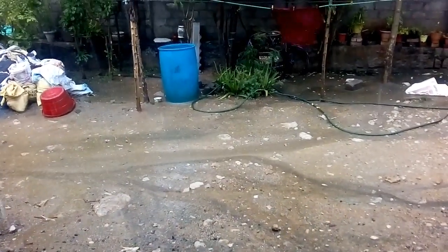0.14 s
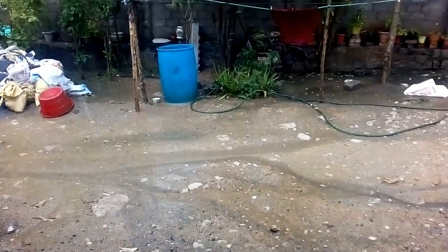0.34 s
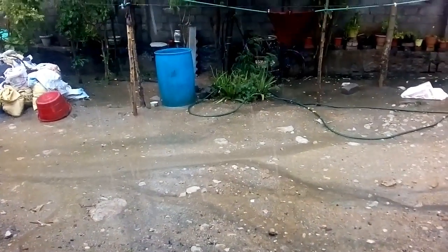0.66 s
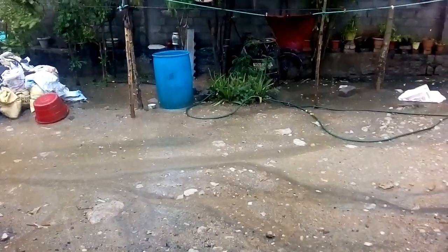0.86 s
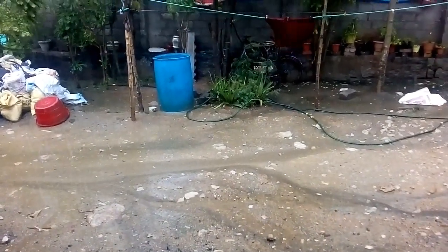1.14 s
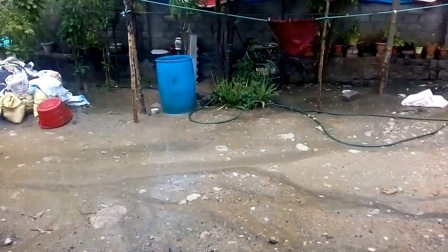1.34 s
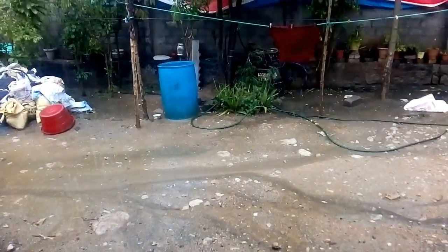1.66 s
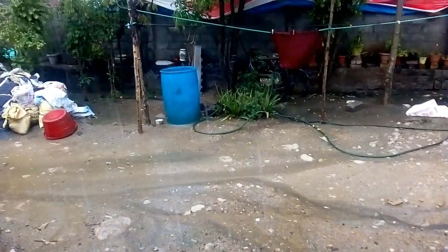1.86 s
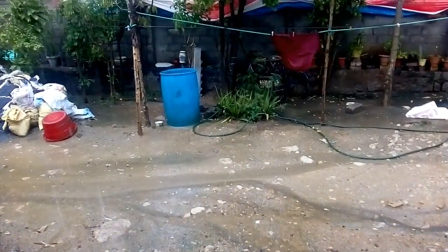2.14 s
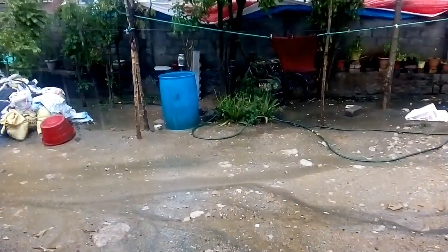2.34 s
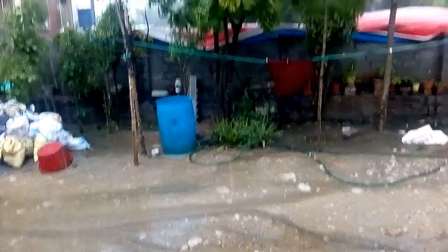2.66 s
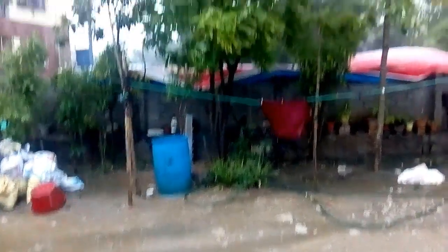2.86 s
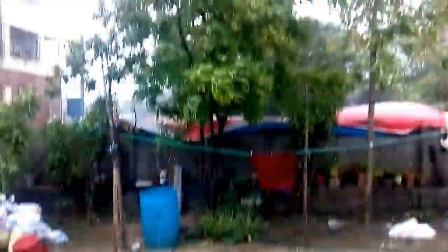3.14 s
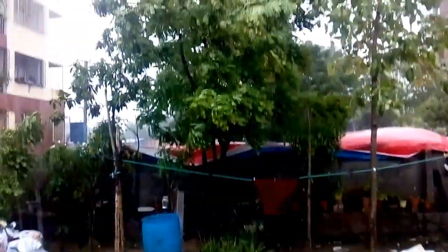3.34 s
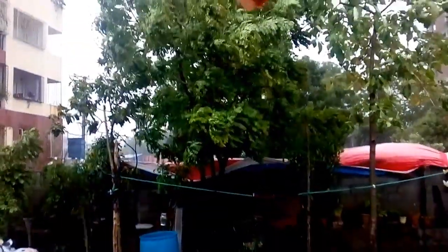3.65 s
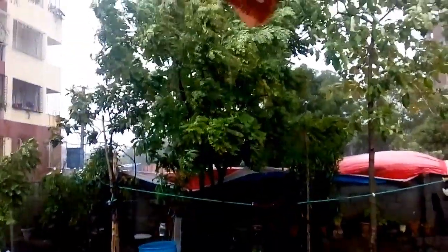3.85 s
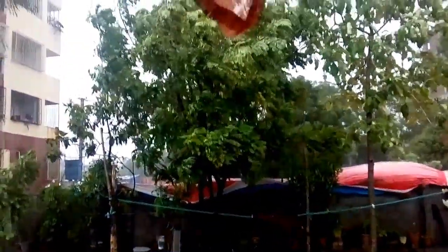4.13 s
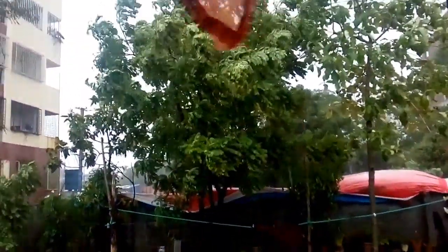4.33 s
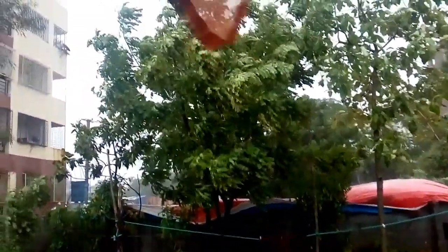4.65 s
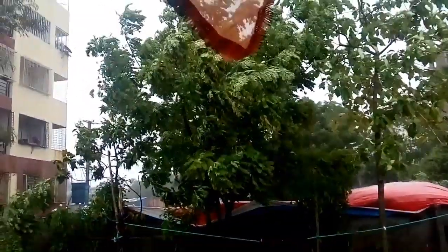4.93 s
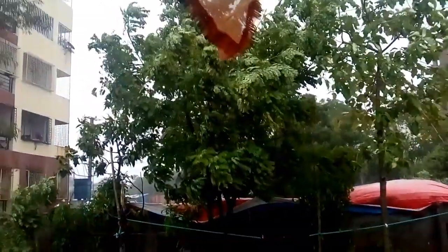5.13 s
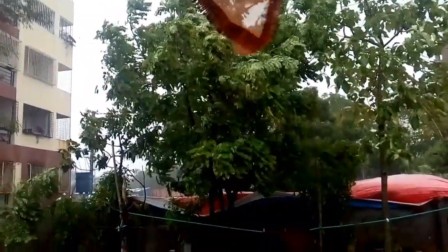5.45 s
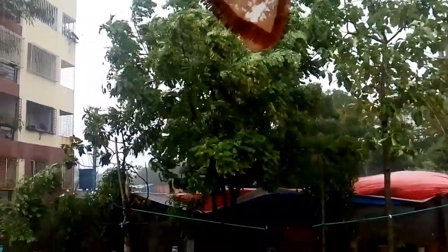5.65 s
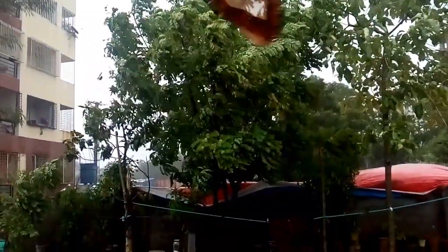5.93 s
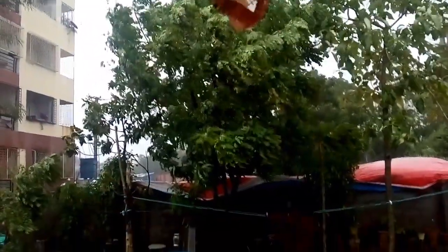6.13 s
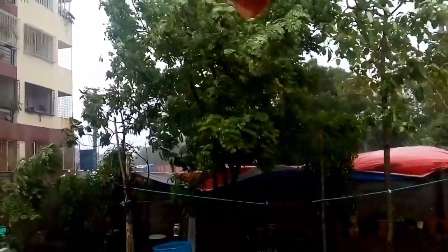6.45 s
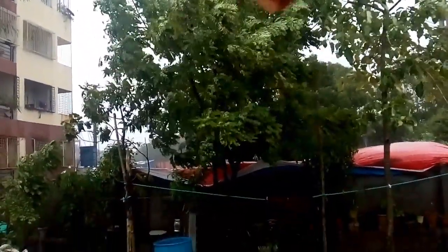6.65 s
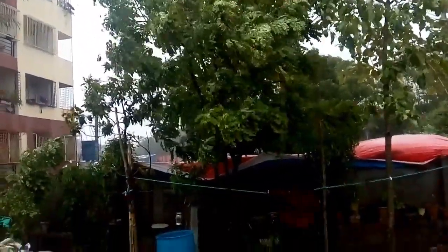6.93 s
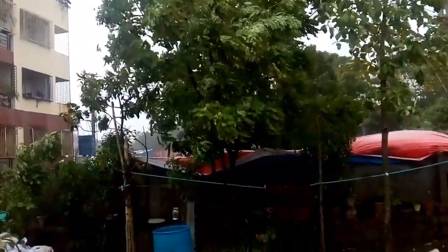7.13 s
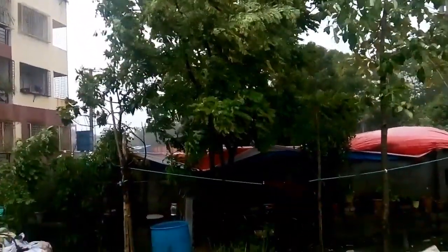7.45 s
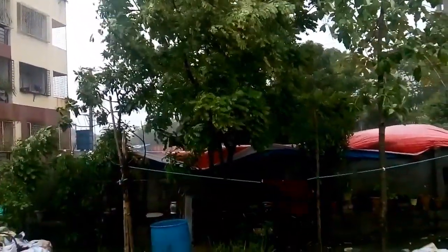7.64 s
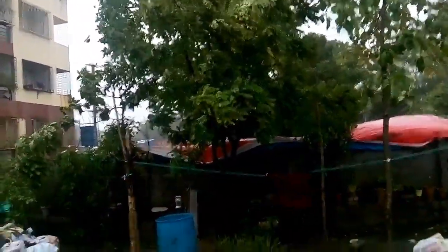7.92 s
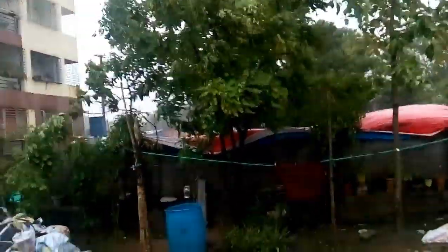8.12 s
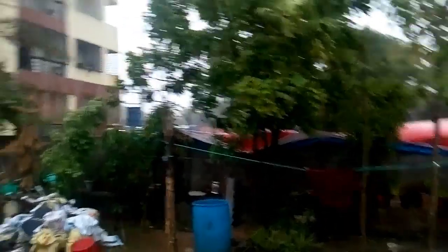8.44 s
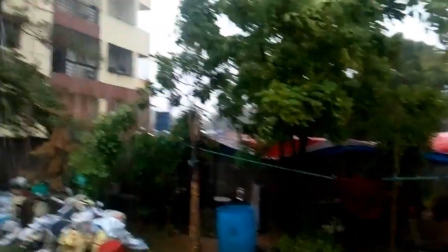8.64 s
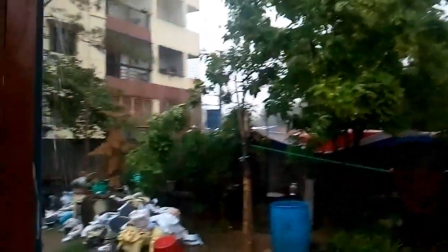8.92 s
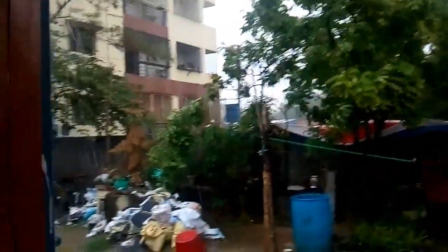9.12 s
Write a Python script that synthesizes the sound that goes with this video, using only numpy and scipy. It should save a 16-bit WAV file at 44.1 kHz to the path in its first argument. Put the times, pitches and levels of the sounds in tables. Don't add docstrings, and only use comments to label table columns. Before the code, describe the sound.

Steady rain on a wet dirt yard and leafy trees, heard from under an eave on a small, bright, slightly thin microphone. Far drops blend into constant hiss over a faint low wash; nearer drops tick densely. Close splats, puddle plinks and heavy drips strike irregularly, crowding together midway, then spreading out as rain eases slightly.

```python
import sys
import numpy as np
from scipy import signal
from scipy.fft import rfft, irfft
from scipy.io import wavfile
from scipy.ndimage import uniform_filter1d

SR = 44100
rng = np.random.default_rng(int(sys.argv[2]) if len(sys.argv) > 2 else 0)


def digitize_waveform(pressure):
    field = np.atleast_2d(pressure).T
    bounded = np.clip(field, -1, 1)
    quanta = np.round(bounded * 32767).astype(np.int16)
    wavfile.write(sys.argv[1], SR, quanta)


def ratio_of_db(decibels):
    return 10 ** (np.asarray(decibels, float) / 20)


N = 409688

# (time [s], rain level [dB], low wash level [dB])
RAIN_LEVELS = [
    (0.0, -25.5, -41),
    (0.77, -26, -43.5),
    (3.0, -26, -42),
    (3.49, -25.5, -42),
    (6.21, -26.5, -42),
    (9.29, -26.5, -41.5),
]
# (frequency [Hz], level per Hz [dB])
WASH_SPECTRUM = [(18, -13), (30, -19), (140, -1), (221, -2), (330, -1), (395, 1), (470, -2.5), (600, -4.5),
                 (1060, -2.5), (1500, -6), (2200, -27)]
# (time [s], peak level [dB], splash ring [Hz], length [ms])
NEAR_SPLATS = [(0.3762, -4.9, 6200, .6), (0.6531, -6.7, 5170, .8), (0.7683, -5.3, 6030, 1.1),
               (1.0337, -6.9, 5860, 1), (1.3575, -7.9, 6160, 1.3), (1.4519, -5.1, 5470, .8),
               (1.5113, -7.2, 5600, .8), (1.8104, -6.5, 6070, .7), (1.8866, -7.8, 5340, 1.5),
               (1.9537, -4.3, 6630, .7), (2.1972, -7.3, 5900, 1.5), (2.293, -6.9, 5640, .6),
               (2.626, -6.8, 6590, .9), (2.7007, -6.3, 6120, .9), (2.9948, -7.9, 6590, .6),
               (3.02, -8.1, 6500, 1.5), (4.1188, -7.8, 6460, .6), (4.5012, -7.6, 6500, 1.5),
               (5.1728, -6.3, 6460, .8), (6.0939, -6.6, 6800, .5), (6.3878, -8.5, 5900, 2),
               (7.4311, -7.6, 6460, .8), (7.6209, -8.5, 5770, 1.1), (7.7563, -6.2, 5340, 1.2),
               (7.8871, -6, 6800, .5), (7.9584, -7, 5900, 1.1), (8.0847, -9.3, 5600, .9),
               (8.1669, -8, 6160, 1.1), (8.5305, -7.5, 6160, .7), (9.0538, -6.2, 6030, .7)]
# (time [s], peak level [dB], puddle ring [Hz], puddle against splash [dB], limiter overshoot [dB])
PUDDLE_PLINKS = [(0.0834, -6.5, 3830, -1, 0), (0.2022, -4.6, 3320, 11, 6.5), (0.2933, -8.5, 3450, 2, 0),
                 (0.3105, -8.9, 3900, 5, 0), (0.439, -8.2, 2200, 0, 0), (0.497, -7.3, 3790, 0, 0),
                 (0.5667, -7.5, 3660, 1, 0), (2.2216, -7.5, 3620, 0, 7.5), (2.7373, -9.2, 3620, 5, 0),
                 (2.7648, -7.9, 3790, 1, 0), (3.5054, -3.7, 1800, -12, 10), (3.6178, -8.5, 2800, 0, 0),
                 (3.6645, -8.6, 2580, -2, 0), (4.5252, -7.1, 3400, 7, 0), (4.5372, -5.5, 3360, 1, 0),
                 (4.5433, -8.1, 3450, -2, 7), (4.9412, -8.4, 3060, 1, 0), (5.5532, -9.5, 3100, 8, 0),
                 (5.9262, -10, 1900, 4, 3.5), (6.6366, -7.6, 3190, 0, 0), (7.2843, -6.6, 2970, 5, 0),
                 (8.2668, -7.7, 2800, 3, 0), (8.5689, -7.6, 3010, 4, 0), (8.8334, -6.3, 2760, 0, 0)]
# (time [s], peak level [dB], splash ring [Hz], limiter overshoot [dB])
EAVE_DRIPS = [(0.4472, -8.3, 6800, 6.5), (0.4733, -4.4, 5680, 4.5), (0.7227, -6, 6370, 8),
              (0.9438, -4.8, 6630, 5.9), (1.243, -9.5, 6200, 8), (1.6818, -6.1, 6680, 4),
              (2.4451, -6.9, 5990, 4), (3.4607, -6.6, 6420, 5.5), (3.7032, -7.7, 6330, 3.3),
              (3.7183, -5.6, 6420, 6.5), (3.7605, -9, 6290, 6), (3.9733, -5.8, 6370, 5.5),
              (4.3068, -8.2, 6120, 3), (4.3973, -7, 6460, 4.5), (4.5868, -7.9, 5860, 4.5),
              (4.669, -8.6, 6240, 3), (5.0124, -9.7, 6630, 6), (5.0292, -6.1, 6500, 5),
              (5.0837, -7.5, 6550, 4.5), (5.2487, -11, 6200, 5.5), (5.2503, -5.5, 6420, 6),
              (5.4249, -5, 6100, 7), (5.8065, -8.2, 5990, 4), (6.0766, -12, 5400, 7.5),
              (6.4556, -6.4, 6460, 6), (7.3038, -6.7, 5730, 2.9), (8.3058, -6.6, 5640, 4),
              (8.5868, -6.2, 5730, 4.5), (8.784, -5.3, 5730, 7), (9.2338, -5.7, 6030, 3.5)]
# (frequency [Hz], level [dB])
MIC_RESPONSE = [(500, -19.5), (1500, -11.5), (2300, -6), (3090, -2.5), (4300, -7), (5500, -2.5),
                (6600, 2.5), (7240, -4.5), (8000, -16.5)]
# (frequency [Hz], level [dB])
TREBLE_LEVEL = [(7900, -20.5), (8600, -23), (10500, -20.5), (11200, -25), (12100, -31.5), (14400, -25),
                (15500, -26.5), (15750, -36), (15900, -90)]

SPRAY_DB, SPRAY_S = -12, 0.0026
STRAY_PER_S, STRAY_PEAK_DB = 21, (-14, -9.5)
PUDDLE_HZ, SPLASH_HZ, PUDDLE_DB = (2500, 4400), (5400, 6800), (-17, -6)
DROP_MS, PLINK_MS, DRIP_MS_PER_DB = (.5, 1.3), 1.4, .12
LOOK_AHEAD_S, HOLD_S, RELEASE_DB_PER_S, ATTACK_S = 0.0087, 0.0089, 173, 0.0018
CROSSOVER_HZ, SHIFT_HZ = 7900, 3890


def rms_one(x):
    return x / np.sqrt(np.mean(x ** 2) + 1e-20)


def at_hz(points, hz):
    table = np.array(points)
    return np.interp(np.log(np.maximum(hz, 5)), np.log(table[:, 0]), table[:, 1])


def colour(x, points):
    cepstrum = irfft(np.log(ratio_of_db(at_hz(points, np.arange(2049) * SR / 4096))))
    cepstrum[1:2048] *= 2
    cepstrum[2049:] = 0
    taps = irfft(np.exp(rfft(cepstrum)))[:2048]
    if x.ndim > 1:
        taps = taps[None]
    return signal.oaconvolve(x, taps, axes=-1)[..., :x.shape[-1]]


def drift(rate):
    r = np.exp(-80 * np.pi * rate / SR)
    slow = signal.lfilter([1], [1, -2 * r, r * r], rng.standard_normal(N // 40 + 2002))[2000:]
    return np.interp(np.arange(N) / 40, np.arange(len(slow)), rms_one(slow))


def decay(hits, seconds):
    return signal.lfilter([1], [1, -np.exp(-1 / (seconds * SR))], hits + 1e-18)


def ring(clicks, hz, cycles):
    r = ratio_of_db(-60 * hz / (cycles * SR))
    w = 2 * np.pi * hz / SR
    return signal.lfilter([1 - r, 0, r - 1], [1, -2 * r * np.cos(w), r * r], clicks + 1e-18)


def low_wash():
    return rms_one(colour(rng.standard_normal(N), WASH_SPECTRUM)) * ratio_of_db(1.03 * drift(8.5))


def far_hiss(patchy_db):
    edges = [20, 1000, 2000, 4000, 6000, 12000]
    hiss = np.zeros(N)
    for band in zip(edges, edges[1:]):
        sos = signal.butter(2, band, "band", fs=SR, output="sos")
        hiss += signal.sosfilt(sos, rng.standard_normal(N)) * ratio_of_db(patchy_db * drift(5.6))
    return rms_one(colour(hiss, MIC_RESPONSE))


def patter(per_s, spread_db, largest, cycles, crack_db, burst_s):
    sizes = ratio_of_db(spread_db * np.minimum(rng.exponential(1, N), largest))
    landed = sizes * (rng.random(N) < per_s * ratio_of_db(2.2 * drift(35)) / SR)
    jitter = rng.standard_normal(N)
    pitches = np.geomspace(1700, 7800, 12)
    dealt = rng.integers(0, 12, N)
    rings = np.zeros(N)
    for k, hz in enumerate(pitches):
        rings += ring(decay(landed * (dealt == k), burst_s) * jitter, hz, cycles)
    spray = ratio_of_db(SPRAY_DB) * decay(landed, SPRAY_S)
    crack = (decay(landed, burst_s) + spray) * jitter
    return rms_one(colour(rms_one(rings) + ratio_of_db(crack_db) * rms_one(crack), MIC_RESPONSE))


def limiter_db():
    over = np.zeros(N)
    ramp = RELEASE_DB_PER_S * np.arange(N) / SR
    for s, *_, over_db in EAVE_DRIPS + PUDDLE_PLINKS:
        span = slice(max(round((s - LOOK_AHEAD_S) * SR), 0), round((s + HOLD_S) * SR))
        over[span] = np.maximum(over[span], over_db)
    released = np.maximum.accumulate(over + ramp) - ramp
    r = np.exp(-1 / (ATTACK_S * SR))
    return signal.lfilter([1 - r], [1, -r], released)


def near_drops():
    low, high = np.transpose([(0, N / SR), STRAY_PEAK_DB, PUDDLE_HZ, SPLASH_HZ, PUDDLE_DB, DROP_MS])
    drips = rng.uniform(low, high, (len(EAVE_DRIPS), 6))
    splats = rng.uniform(low, high, (len(NEAR_SPLATS), 6))
    plinks = rng.uniform(low, high, (len(PUDDLE_PLINKS), 6))
    drips[:, [0, 1, 3]] = np.array(EAVE_DRIPS)[:, :3]
    drips[:, 5] = DROP_MS[0] + DRIP_MS_PER_DB * np.array(EAVE_DRIPS)[:, 3]
    splats[:, [0, 1, 3, 5]] = np.array(NEAR_SPLATS)
    plinks[:, [0, 1, 2, 4]] = np.array(PUDDLE_PLINKS)[:, :4]
    plinks[:, 5] = PLINK_MS
    strays = rng.uniform(low, high, (round(STRAY_PER_S * N / SR), 6))
    return np.vstack([drips, splats, plinks, strays])


def splashes(wobble, crack_db, swell, tail_db, tail_s):
    s, peak_db, puddle_hz, splash_hz, puddle_db, length_ms = near_drops().T[:, :, None]
    t = np.arange(1, 1025) / SR
    age = t / (swell * length_ms / 1000)
    shape = age ** 1.4 * np.exp(1.4 * (1 - age))
    chance = rng.standard_normal((len(s), 3, 1024))
    bend = 1 + wobble * uniform_filter1d(chance[:, :2], size=24, axis=2)
    turns = np.cumsum(np.stack([puddle_hz, splash_hz], axis=1) * bend, axis=2) / SR
    waves = np.sin(2 * np.pi * turns + 9 * chance[:, :2, :1])
    tones = (ratio_of_db(puddle_db) * waves[:, 0] + waves[:, 1]) * shape
    cracks = colour(chance[:, 2] * np.exp(-t * 6000), MIC_RESPONSE)
    tails = colour(chance[:, 2] * np.exp(-t / tail_s) * np.minimum(age, 1), MIC_RESPONSE)

    out, loss_db = np.zeros(N + 1024), limiter_db()
    starts = np.round(s[:, 0] * SR).astype(int)
    for at, level_db, tone, crack, tail in zip(starts, peak_db, tones, cracks, tails):
        drop = rms_one(tone) + ratio_of_db(crack_db) * rms_one(crack) + ratio_of_db(tail_db) * rms_one(tail)
        out[at:at + 1024] += ratio_of_db(level_db + loss_db[at]) * drop / np.abs(drop).max()
    return out[:N]


def scene():
    s, rain_db, wash_db = np.transpose(RAIN_LEVELS)
    time = np.arange(N) / SR
    rain_db = np.interp(time, s, rain_db)
    wash_db = np.interp(time, s, wash_db)
    fine = patter(per_s=1800, spread_db=-0.5, largest=2.6, cycles=10.2, crack_db=-2.0, burst_s=0.00025)
    coarse = patter(per_s=320, spread_db=7.0, largest=2.25, cycles=34.0, crack_db=-3, burst_s=0.00059)
    hiss = far_hiss(patchy_db=-0.9)
    rain = ratio_of_db(-3.5) * hiss + ratio_of_db(-3.0) * fine + ratio_of_db(-7.5) * coarse
    wash = low_wash()
    near = splashes(wobble=.1, crack_db=-11, swell=.36, tail_db=-5.5, tail_s=.0055)
    flutter = ratio_of_db(0.85 * drift(45))
    return (flutter * (ratio_of_db(rain_db) * rain + ratio_of_db(wash_db + 2.5) * wash) + near)[None]


def rebuild_treble(x, noise_db, follow_s, sharpen):
    spectrum, hz = rfft(x), np.arange(N // 2 + 1) * SR / N
    upper_half = (hz >= CROSSOVER_HZ - SHIFT_HZ) & (hz < CROSSOVER_HZ)
    flat = spectrum / ratio_of_db(at_hz(MIC_RESPONSE, hz)) * upper_half
    r = np.exp(-1 / (follow_s * SR))
    level = np.sqrt(signal.lfilter([1 - r], [1, -r], irfft(flat, N) ** 2))
    fill = rfft(level * rng.standard_normal(N)) * (hz >= CROSSOVER_HZ)
    step = round(SHIFT_HZ * N / SR)
    copies = np.roll(flat, step) + np.roll(flat, 2 * step) + ratio_of_db(noise_db) * fill
    treble = irfft(copies * ratio_of_db(at_hz(TREBLE_LEVEL, hz)), N)
    treble = treble * (rms_one(level) + .1) ** sharpen
    return irfft(spectrum * (hz < CROSSOVER_HZ), N) + treble


def top_cut(x):
    return signal.sosfilt(signal.butter(12, 16680, fs=SR, output="sos"), x)


def record(dry):
    limited = dry[0] * ratio_of_db(-limiter_db())
    rounded = limited / (1 + (limited / .8) ** 4) ** .25
    mix = rebuild_treble(rounded, noise_db=9.5, follow_s=0.00023, sharpen=0.064)[None]
    return top_cut(mix)


dry = scene()
out = record(dry)
digitize_waveform(out)
```